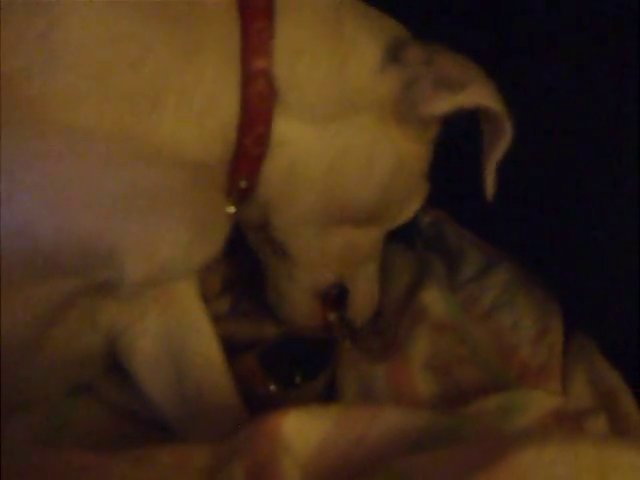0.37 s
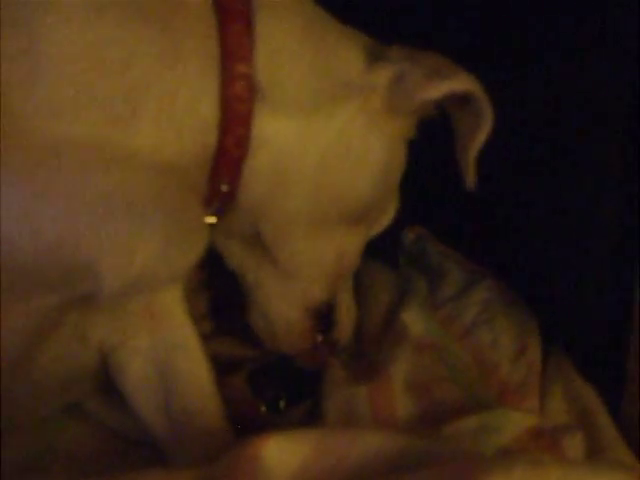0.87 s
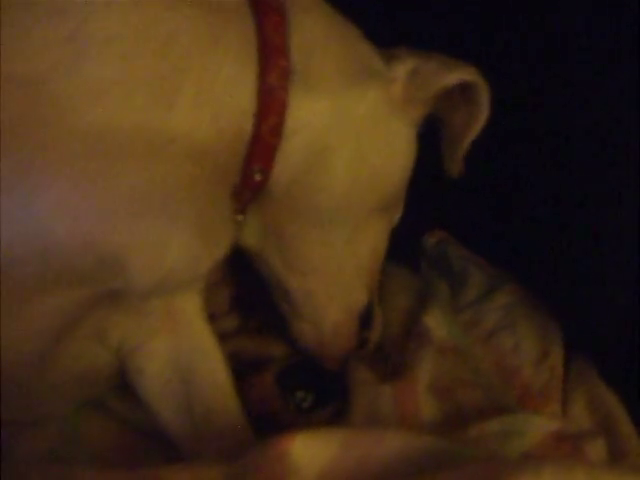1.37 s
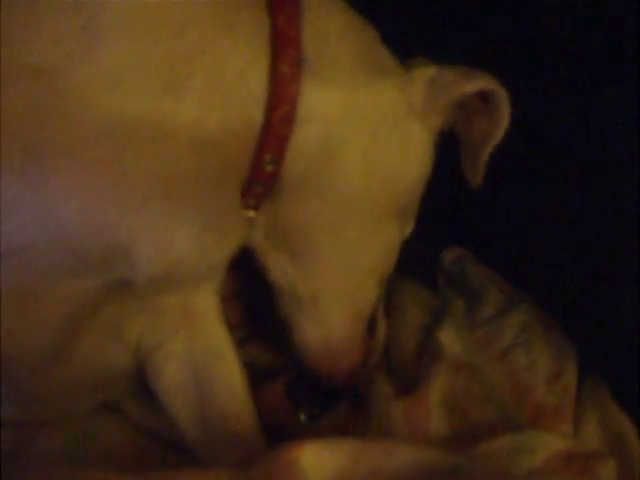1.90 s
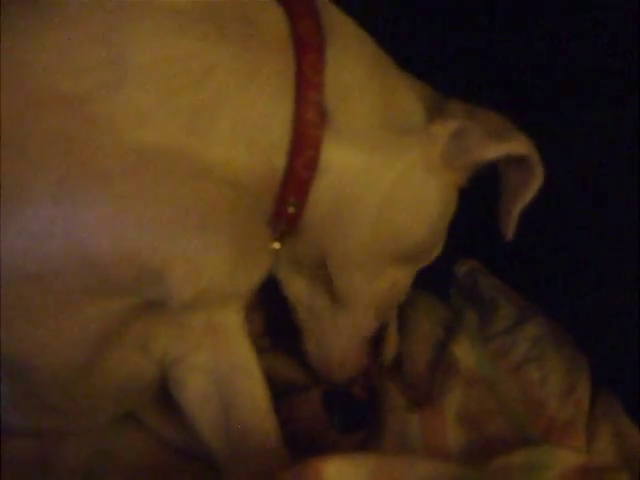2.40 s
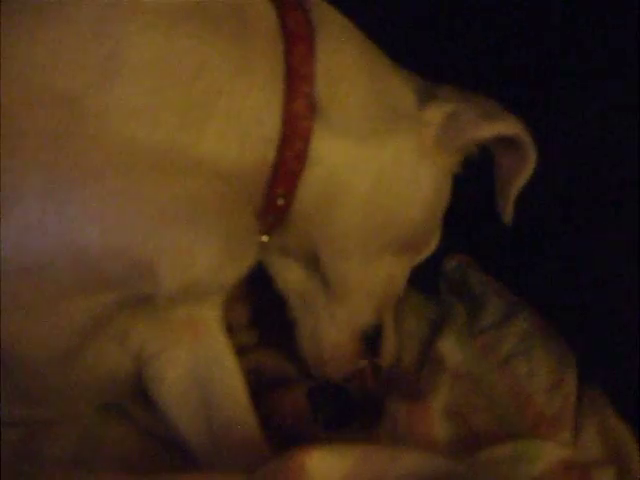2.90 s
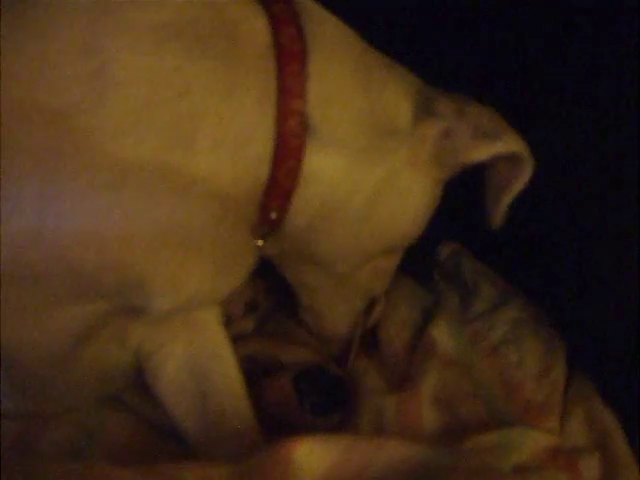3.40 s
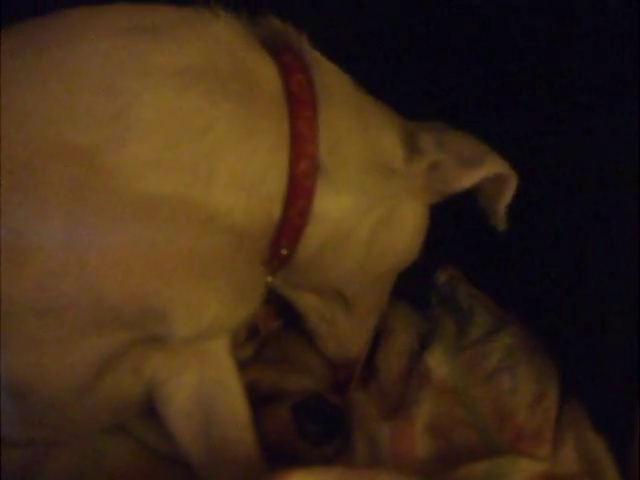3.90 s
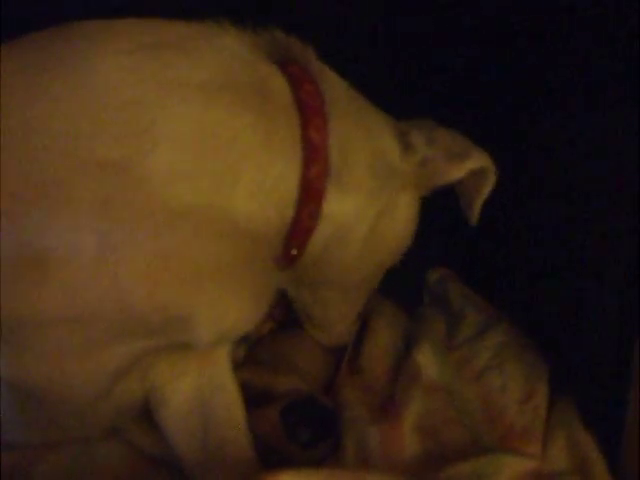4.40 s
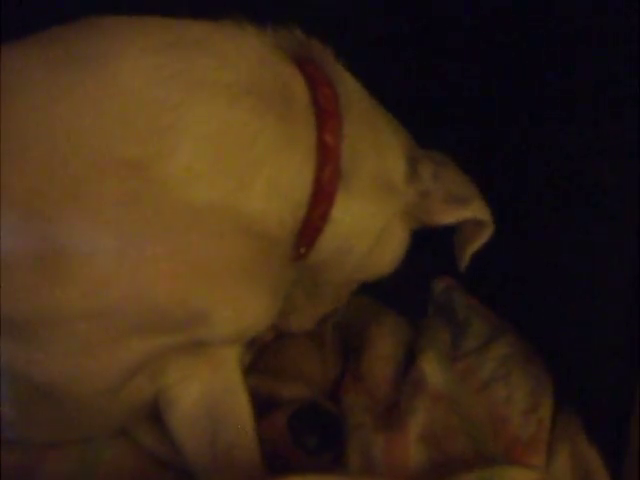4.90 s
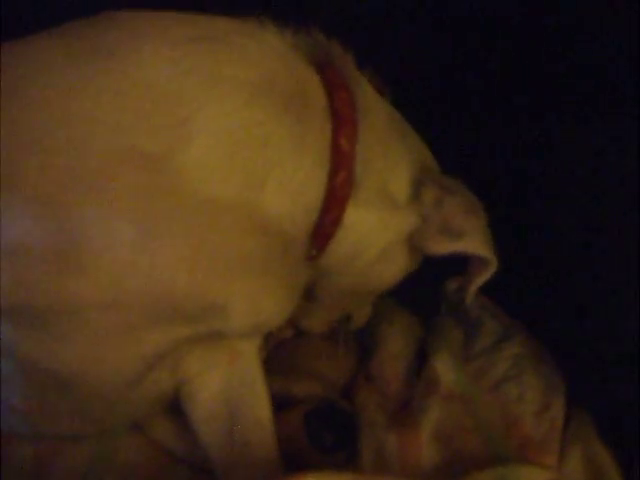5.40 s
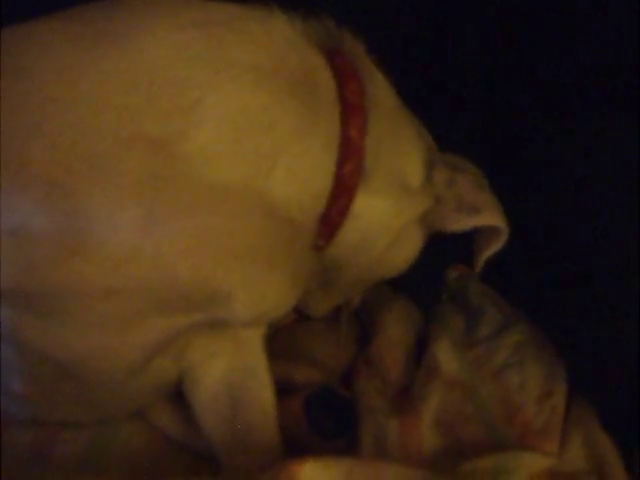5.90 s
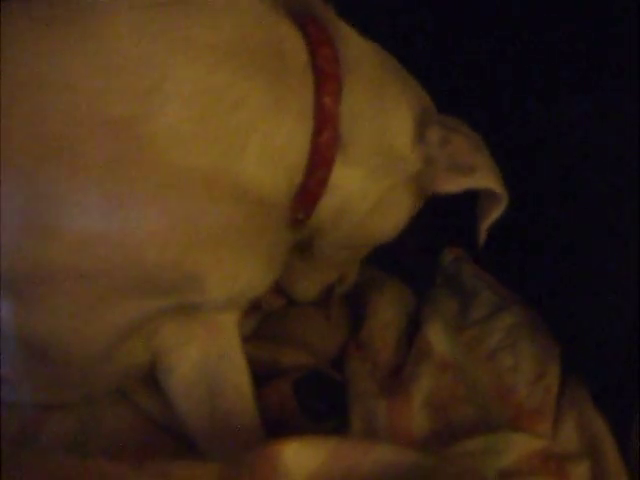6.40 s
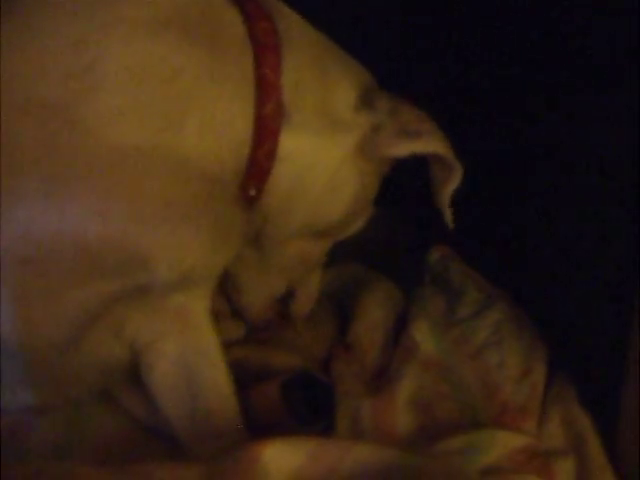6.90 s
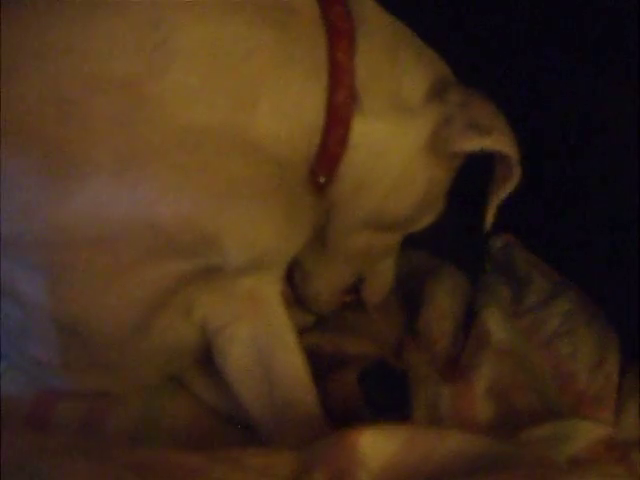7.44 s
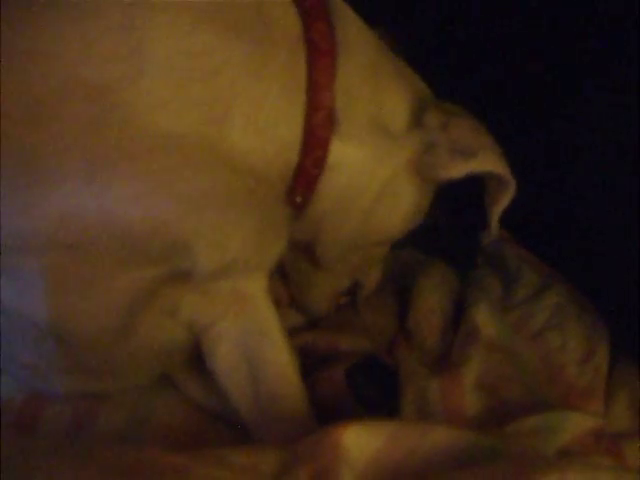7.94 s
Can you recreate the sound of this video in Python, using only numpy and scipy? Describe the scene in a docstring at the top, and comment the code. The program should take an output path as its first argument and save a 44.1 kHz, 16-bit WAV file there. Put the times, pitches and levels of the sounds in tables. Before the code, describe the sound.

Steady wet licking, ticking about three strokes a second, surrounds a newborn puppy's short wavering mews. The cries begin bright and piercing, then slide down, grow hoarse and weaken towards the end. Crisp tongue clicks and small hollow pops come irregularly, and a few barely audible low grunts come from the mother dog. Close, dry indoor pickup with dull rumble and faint microphone hiss.

```python
"""A newborn puppy mews for eight seconds in a quiet bedroom, close to a small camera microphone.
From the start the room rumbles, the microphone hisses, and the mother licks, her tongue ticking on wet fur.
The cries are harmonic stacks filtered by throat and mouth; saliva smacks are bursts of damped sines.
Soon hollow mouth pops join in as decaying resonances; about two seconds in, the mother begins
to grunt low, each grunt a two-partial tone. Bedding returns the cries and mouth sounds once."""
import sys
import numpy as np
from scipy import signal
from scipy.fft import rfft, irfft
from scipy.io import wavfile
from scipy.ndimage import uniform_filter1d

SR = 44100
rng = np.random.default_rng(int(sys.argv[2]) if len(sys.argv) > 2 else 0)


def waveform_to_disk(signal):
    """Save audio, clipped to [-1, 1], as 16-bit WAV at the path in sys.argv[1]."""
    frames = np.transpose(np.atleast_2d(signal))
    scaled = np.clip(frames, -1, 1) * 32767
    samples = np.round(scaled).astype(np.int16)
    wavfile.write(sys.argv[1], SR, samples)


def gain_from_decibels(decibels):
    """Convert decibel values to linear amplitude factors."""
    exponent = np.asarray(decibels, float) / 20
    return 10 ** exponent


N = 354999
T = np.arange(N) / SR


def colour(points, hz):
    """Spectral envelope: level in dB interpolated along a logarithmic frequency axis."""
    at, db = np.transpose(points)
    return np.interp(np.log(np.maximum(hz, 1)), np.log(at), db)


def room():
    """Stationary coloured noise: white noise shaped in the spectrum into rumble and microphone hiss."""
    # noise spectrum: f/Hz, relative level/dB
    room_spectrum = [(12, -36.5), (20, 6.5), (85, -6.5), (265, -17.5), (1080, -19), (7870, -25.5),
                     (9210, -35.5), (10200, -50.5), (13300, -103)]
    room_db = -45  # rms
    hz = np.fft.rfftfreq(N, 1 / SR)
    spectrum = rfft(rng.standard_normal(N)) * gain_from_decibels(colour(room_spectrum, hz))
    noise = irfft(spectrum, N)
    return noise / noise.std() * gain_from_decibels(room_db)


def walk(rate):
    """Low-pass random modulation: held random values, `rate` per second, smoothed twice to unit spread."""
    hold = int(SR / rate)
    steps = np.repeat(rng.standard_normal(N // hold + 1), hold)
    smooth = uniform_filter1d(uniform_filter1d(steps, hold), hold)[:N]
    return smooth / smooth.std()


def glide(s, v, t):
    """Monotone cubic interpolation: harmonic-mean slopes keep the curve from overshooting its points."""
    d = np.diff(v) / np.diff(s)
    before, after = d[:-1], d[1:]
    inner = np.where(before * after > 0, 2 * before * after / (before + after + 1e-9), 0)
    m = np.r_[d[0], inner, d[-1]]
    k = np.clip(np.searchsorted(s, t) - 1, 0, len(s) - 2)
    h = s[k + 1] - s[k]
    u = (t - s[k]) / h
    rise = u * u * (3 - 2 * u) * (v[k + 1] - v[k])
    bend = h * u * (1 - u) * ((1 - u) * m[k] - u * m[k + 1])
    return v[k] + rise + bend


def fold_slip():
    """Period doubling: the depth (0-1) to which the vocal folds slip and rasp, ramped at both ends."""
    # slipping spells: start t/s, end t/s, depth (0-1)
    doubling = [(3.765, 3.85, .45), (4.1, 4.23, .25), (5.2, 5.42, .25), (5.85, 5.97, .6), (6.47, 6.6, .3),
                (7.26, 7.44, .45), (7.92, 8.1, .3)]
    return sum(depth * np.clip(np.minimum(T - a, b - T) / 0.026, 0, 1) for a, b, depth in doubling)


def harmonic_gains(k, hz, opening, t):
    """Source-filter principle: throat, mouth resonance and treble balance weight harmonics k of pitch hz."""
    # colour of throat and nose: f/Hz, level/dB
    throat = [(620, -30), (820, 8.5), (1350, -2.5), (2100, -1.2), (3300, -3.5), (3900, -12), (5300, -21.5),
              (6600, -51.5)]
    # extra level of the harmonics above 3.5 kHz: t/s, level/dB
    treble = [(.5, -1.5), (.62, -15), (.78, -16), (.85, 2), (1.88, 7.5), (1.96, -27), (2.6, 1), (4.95, -6),
              (5.2, 14.5), (6.2, 1.5), (7.9, 19.5)]
    shut_hz, mouth_db, mouth_octaves = 1172, 13.5, 0.54  # resonance: shut frequency, height, width
    # the resonance climbs two octaves as the mouth opens
    off = (np.log2(k * hz / shut_hz) - 2 * opening) / mouth_octaves
    db = colour(throat, k * hz) + mouth_db * np.exp(-.5 * off ** 2)
    db += np.clip((k * hz - 3500) / 600, 0, 1) * np.interp(t, *np.transpose(treble))
    return gain_from_decibels(db)


def puppy():
    """Voiced sound: vocal folds give a harmonic series with trembling pitch and wavering partials."""
    # cries: start t/s, end t/s, pitch factor of the opening squeak, pitch factor of the closing flick
    cries = [(0.0, 0.046, 0.91, 0.93), (0.41, 1.129, 2.16, 1.13), (1.502, 2.15, 1.52, 1.3),
             (2.568, 3.127, 1.6, 1.15), (3.549, 4.221, 1.23, 1.03), (4.63, 5.423, 0.99, 2.5),
             (5.873, 6.579, 1.1, 1.27), (7.288, 7.411, 1.16, 1), (7.943, 8.2, 0.85, 1)]
    # one table a cry: t/s, pitch f/Hz before squeak and flick, nominal rms level/dB, mouth opening (0-1)
    contours = [
        [(0.0, 1567, -30, 0.07), (0.03, 1910, -44.5, .2)],
        [(0.44, 1077, -35.5, 0.3), (0.505, 1416, -30, 0.41), (0.66, 1358, -27, 0.47), (0.74, 1390, -31, 0.39),
         (0.82, 1351, -35.5, 0.22), (1.022, 1325, -42, 0.33), (1.032, 1372, -38, 0.39),
         (1.108, 1673, -35.5, 0.34)],
        [(1.534, 1137, -39, 0.34), (1.602, 1480, -30.5, 0.24), (1.672, 1635, -35.5, 0.73),
         (1.74, 1487, -34.5, 1), (1.821, 1336, -34.5, 0), (1.86, 1466, -38.5, 0.33), (1.96, 1318, -31.5, 0.19),
         (2.08, 1271, -36, 0.22), (2.13, 1547, -43, 0.37)],
        [(2.588, 1068, -33, 0.41), (2.684, 1461, -27.5, 0.41), (2.87, 1271, -27.5, 0.3),
         (3.002, 1204, -35, 0.21), (3.087, 1080, -34, 0.19), (3.107, 1268, -39.5, 0.2)],
        [(3.572, 1034, -39.5, 0.51), (3.628, 1054, -32, 0.59), (3.8, 939, -40, 0.43), (3.895, 801, -35, 0.4),
         (3.96, 891, -36.5, 0.52), (4.077, 920, -36.5, 0.48), (4.114, 775, -36.5, 0.35),
         (4.14, 751, -35.5, 0.35), (4.2, 889, -39.5, 0.53)],
        [(4.632, 943, -38, 0.62), (4.702, 1218, -30.5, 0.22), (4.75, 1322, -28, 0.28),
         (4.939, 1072, -31.5, 0.34), (4.98, 1081, -30.5, 0.33), (5.1, 989, -39, 0.56),
         (5.225, 827, -41.5, 0.34), (5.341, 763, -40, 0.38), (5.4, 906, -44.5, 0.42)],
        [(5.89, 613, -48, 0.32), (6.03, 691.5, -36, 0.43), (6.12, 654.6, -41, 0.35), (6.225, 762, -34.5, 0.32),
         (6.32, 713.6, -37.5, 0.4), (6.49, 632.4, -40.5, 0.32), (6.55, 676, -40.5, 0.23)],
        [(7.31, 468.5, -52.5, 0.38), (7.39, 435, -44.5, 0.09)],
        [(7.965, 557.5, -44.5, 0.26), (8.045, 554, -43.5, 0.33)],
    ]
    # single overtones that sing out: start t/s, end t/s, harmonic number, nominal added rms level/dB
    overtones = [(.86, 1.05, 5, -59), (.9, 1.035, 6, -53)]
    # the tight folds relax at the start and snap tight as the air runs out
    squeak_s, flick_s = .03, 0.018
    flick_dull_db = 9  # lost per harmonic number in the flick
    air_db = -5  # air hissing past the slipping folds, relative to the cry's nominal level
    out, tremble, rasp = np.zeros(N), 0.007 * walk(40), walk(1200)
    waver_db = np.array([(1.95 + .35 * n) * walk(70) for n in range(11)])
    air_band = signal.butter(2, [900, 4600], "band", fs=SR, output="sos")
    air = signal.sosfilt(air_band, rng.standard_normal(N))
    k = np.arange(1, 12)[:, None]  # harmonic numbers
    slip = fold_slip()
    for (start, end, squeak, flick), contour in zip(cries, contours):
        i = slice(int(start * SR), int(end * SR))
        t = T[i]
        since, left = t - start, end - t
        # the folds are unsteady while they start and stop, and while they slip
        rough = slip[i] + .9 * np.exp(-np.minimum(since, left) / .025)
        s, *columns = np.array(contour, float).T
        hz, level_db, opening = (glide(s, c, np.clip(t, s[0], s[-1])) for c in columns)
        relaxing = np.clip(1 - since / squeak_s, 0, 1) ** 2
        closing = np.clip((flick_s - left) / 0.0039, 0, 1)
        hz = hz * (1 + (squeak - 1) * relaxing + (flick - 1) * closing)
        jitter = tremble[i] + (.005 + .03 * rough) * rasp[i]
        phase = 2 * np.pi * np.cumsum(hz * (1 + jitter)) / SR
        gain = harmonic_gains(k, hz, opening, t)
        # normalise the power of the stack, then set its level
        gain *= gain_from_decibels(level_db - flick_dull_db * (k - 1.5) * closing) / np.sqrt(np.sum(gain ** 2, axis=0))
        for a, b, order, db in overtones:
            gain[order - 1] += gain_from_decibels(db) * np.clip(np.minimum(t - a, b - t) / squeak_s, 0, 1)
        voice = np.sum(gain * gain_from_decibels(waver_db[:, i]) * np.sin(k * phase + k * k), axis=0)
        # every second cycle is weaker while the folds slip
        voice *= 1 + slip[i] * np.cos(phase / 2) + (.04 + .5 * rough) * rasp[i]
        # the hiss of air pulses once a cycle
        voice += gain_from_decibels(level_db + air_db) * slip[i] * (1 + np.cos(phase)) * air[i] / air.std()
        envelope = np.clip(np.minimum(since / 0.0026, left / 0.02), 0, 1)
        out[i] += np.sqrt(2) * envelope * voice  # root two turns peak level into rms
    return out


def add(out, s, sound):
    """Superposition: mix a short sound in at time s."""
    i = int(s * SR)
    out[i:i + len(sound)] += sound[:N - i]


def ring(hz, decay_ms):
    """Damped oscillation of a bursting film or bubble: quick rise, exponential decay, unit peak, 20 ms."""
    ms = np.arange(int(.02 * SR)) / SR * 1000
    envelope = (1 - np.exp(-ms / 0.47)) * np.exp(-ms / decay_ms)
    x = envelope * np.sin(2 * np.pi * hz * ms / 1000)
    return x / np.abs(x).max()


def crackle(centre_hz, chance):
    """Impulse cluster: three tiny damped snaps start within 4 ms, scattered in pitch."""
    x = np.zeros(int(.03 * SR))
    for late, pitch in chance.reshape(3, 2):
        add(x, late * .004, ring(centre_hz * (.7 + .5 * pitch), .35))
    return x


def wet_fur(count=640):
    """Random point process with periodic rate: faint ticks of wet fur bunch in each stroke of the tongue."""
    licks_per_s = 3.3
    out = np.zeros(N)
    # count is the number of candidates; the stroke rhythm thins them
    for when, pitch, size, stroke, *chance in rng.random((count, 10)):
        s = when * N / SR
        if stroke < .55 + .45 * np.cos(2 * np.pi * licks_per_s * (s - .33)):
            tick = crackle(7400 / (1 + 4.5 * pitch ** 5), np.array(chance))
            add(out, s, gain_from_decibels(-43 + 8.5 * size ** 2) * tick)
    return out


def smacks():
    """Film rupture: one large saliva film snaps among eight small ones that crackle ever fainter."""
    # wet smacks of the tongue: onset t/s, nominal level/dB, ring f/Hz
    smack_events = [(0.04, -27, 6950), (0.071, -25.5, 6550), (0.238, -21, 6000), (0.336, -19.5, 6300),
                    (0.3707, -28, 6700), (0.561, -27.5, 6700), (0.604, -15.5, 6470), (0.663, -24.5, 6300),
                    (0.819, -30, 7300), (0.8603, -14, 5100), (1.754, -17, 6220), (2.299, -25, 6500),
                    (2.5763, -22.5, 6440), (2.842, -16.5, 6030), (3.069, -25.5, 5920), (3.4173, -22, 6320),
                    (3.5567, -29, 5930), (4.7398, -18, 5740), (4.7469, -16.5, 6420), (4.7595, -23.5, 4040),
                    (5.0208, -10, 7140), (5.042, -21, 4230), (5.3158, -19.5, 6240), (5.9754, -26.5, 6740),
                    (6.0017, -20, 3700), (7.889, -25, 6750), (0.9266, -29, 6250), (1.085, -31, 7260),
                    (1.401, -26, 4050), (3.803, -28.5, 6430), (3.859, -31.5, 6300), (4.168, -31.5, 4600),
                    (6.313, -32.5, 7300), (3.8305, -29, 6570), (5.0878, -30.5, 7400), (5.9269, -28.5, 6900),
                    (6.548, -30, 6800), (7.5742, -27, 6330)]
    out = np.zeros(N)
    for (s, db, hz), chance in zip(smack_events, rng.random((len(smack_events), 2, 8))):
        add(out, s + .0008, gain_from_decibels(db + 2.5) * ring(hz, 0.35))
        for late, pitch in chance.T:
            small_film = ring(hz * (.75 + .5 * pitch), 0.095)
            add(out, s + late ** 1.5 * 0.0093, gain_from_decibels(db - 1.5 - 6.6 * late) * small_film)
    return signal.sosfilt(signal.butter(2, 3000, "high", fs=SR, output="sos"), out)


def pops():
    """Cavity resonance: the mouth rings for a few cycles over a duller thump."""
    # hollow pops of the mouth: t/s, level/dB of the cavity ring, ring f/Hz
    pop_events = [(0.299, -26, 1046), (.561, -18.5, 980), (0.819, -29, 1020), (1.086, -28.5, 1040),
                  (1.362, -31.5, 1070), (1.65, -32, 337), (1.714, -29, 1090), (2.388, -34, 1310),
                  (2.797, -27, 1045), (3.387, -30.5, 845), (3.593, -36.5, 363), (3.685, -33.5, 304),
                  (3.775, -33, 940), (6.002, -27.5, 1720), (6.231, -26.5, 760), (7.575, -27.5, 2680),
                  (7.613, -32, 1310), (7.651, -34.5, 1350), (7.93, -31, 1450)]
    out = np.zeros(N)
    for s, db, hz in pop_events:
        add(out, s, gain_from_decibels(db) * (ring(hz, 2.26) + 0.27 * ring(364.0, 19.0)))
    return out


def mother():
    """Closed-mouth phonation: a soft low fundamental with a weak second harmonic and wobbling pitch."""
    # low grunts: start t/s, length t/s, pitch f/Hz, peak level/dB of the fundamental
    grunts = [(1.949, 0.25, 153.4, -44), (2.775, 0.24, 184.8, -50.5), (3.711, 0.25, 191, -50)]
    out, wobble = np.zeros(N), walk(25.65)
    for s, length, hz, db in grunts:
        # nearly flat with quick ends; rounding of sin(pi) leaves the tone on, about 26 dB down, afterwards
        swell = np.sin(np.pi * np.clip((T - s) / length, 0, 1)) ** 0.083
        phase = 2 * np.pi * np.cumsum(hz * (1 + 0.0144 * wobble)) / SR
        out += gain_from_decibels(db) * swell * (np.sin(phase) + 0.25 * np.sin(2 * phase))
    return out


def echo(x, db):
    """Comb filtering: a sound interferes with its single delayed reflection from the bedding."""
    delay_ms = 4.2
    return x + gain_from_decibels(db) * np.roll(x, int(delay_ms * SR / 1000))


def scene():
    """Single reflection: the bedding returns the pops strongest, the cries and tongue sounds more weakly."""
    background = room()
    cry = echo(puppy(), -9)  # the echo beats with the gliding cry
    mouth = echo(wet_fur() + smacks(), -10.5) + echo(pops(), -3.0)
    return (cry + mouth + mother() + background)[None]


def top_cut(x):
    """Nothing passes above the cut-off."""
    return signal.sosfilt(signal.butter(12, 10370, fs=SR, output="sos"), x)


def record(dry):
    """Linear filtering: the microphone port rings in the treble, the top rolls off, a constant offset stays."""
    port_hz, port_q, port_gain = 7880, 39, 0.38
    offset = -.0034  # of full scale
    port_ring = signal.lfilter(*signal.iirpeak(port_hz, port_q, SR), dry)
    steep_cut = signal.butter(10, 8700, fs=SR, output="sos")
    picked_up = signal.sosfilt(steep_cut, dry + port_gain * port_ring)
    return top_cut(picked_up + offset)


dry = scene()
out = record(dry)
waveform_to_disk(out)
```